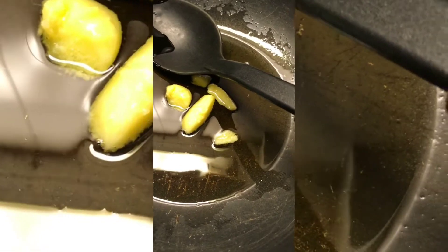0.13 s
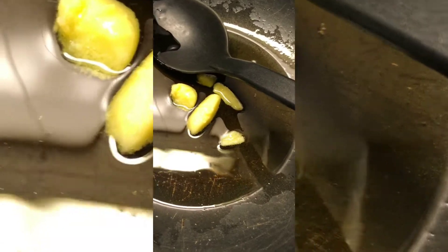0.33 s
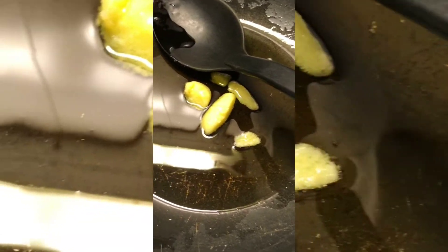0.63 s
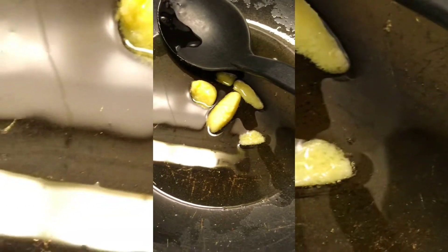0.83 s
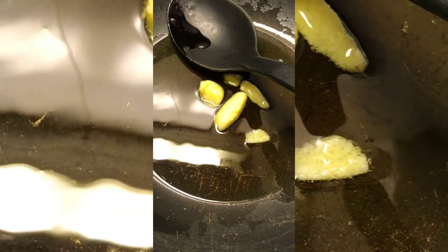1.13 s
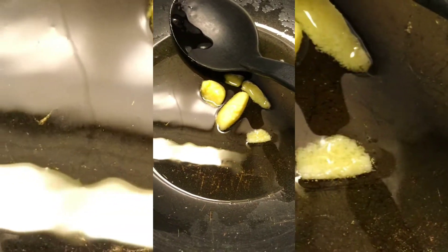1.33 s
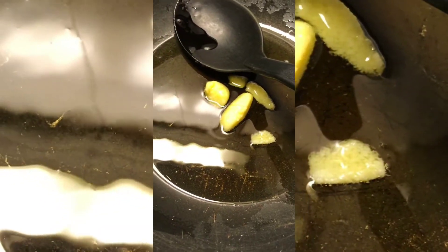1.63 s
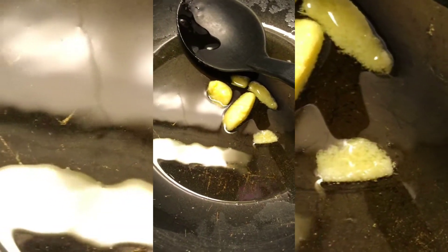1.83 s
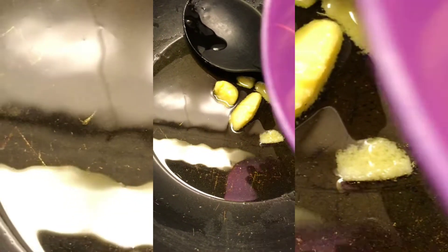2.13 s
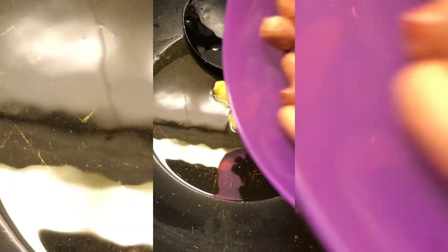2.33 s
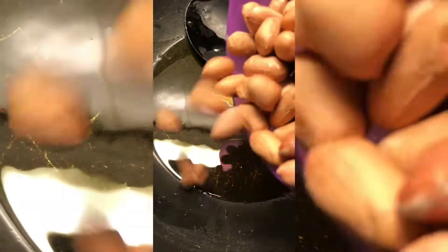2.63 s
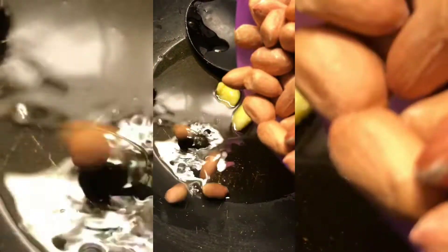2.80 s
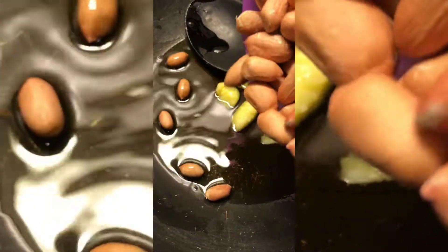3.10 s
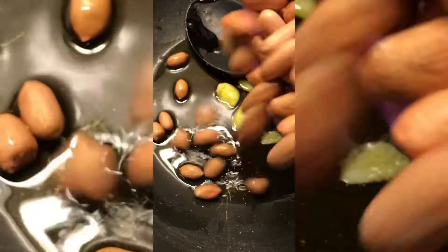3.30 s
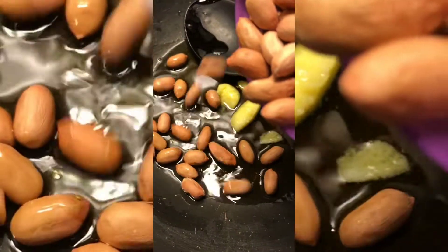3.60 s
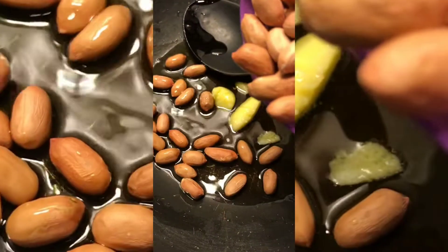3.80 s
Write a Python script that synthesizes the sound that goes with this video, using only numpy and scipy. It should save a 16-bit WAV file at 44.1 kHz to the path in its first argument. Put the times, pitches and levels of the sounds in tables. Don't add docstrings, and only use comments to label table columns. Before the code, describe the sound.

Raw peanuts knock in a plastic bowl, then drop in two clattering bursts into a buttered steel pan, close to the microphone, in a small kitchen with a steady low extractor fan hum.

```python
import sys
import numpy as np
from scipy import signal
from scipy.fft import rfft, irfft
from scipy.io import wavfile
from scipy.ndimage import uniform_filter1d

SR = 44100
rng = np.random.default_rng(int(sys.argv[2]) if len(sys.argv) > 2 else 0)


def gain_from_db(level_db):
    decades = np.asarray(level_db, float) / 20
    return 10 ** decades


def dump(signal):
    limited = np.clip(np.atleast_2d(signal).T, -1, 1)
    pcm = np.round(limited * 32767).astype(np.int16)
    wavfile.write(sys.argv[1], SR, pcm)


N = 174195

# freq_hz, density_db
AIR_COLOUR = [(25, -34), (55, -6.5), (200, -11), (470, -35), (1400, -31.5), (3500, -40), (8000, -53.5),
              (15800, -56.5)]
# time_s, level_db
AIR_SWELL = [(0, 3), (1, 3), (2.2, 1), (3.1, 4), (3.95, 1.5)]
# freq_hz, width_hz, level_db
DUCT_MODES = [(99.64, 15, -41), (131, 12, -46), (225.3, 73, -51), (325.5, 82, -47), (617.7, 67, -51.5),
              (924, 200, -52), (1220, 260, -59), (1668, 77, -66.5), (5200, 270, -92), (2160, 64, -74),
              (2460, 93, -69), (3316, 200, -72)]
AIR_DB, HUM_HZ, HUM_PEAK_DB = -44.5, 99.5, -37

# start_s, length_s, level_db
SCUFFS = [
    (.2325, .002, 0),
    (.239, .009, 0),
    (.250, .014, -13),
    (.266, .002, -4),
    (.296, .008, -7),
]
# freq_hz, density_db
SCUFF_COLOUR = [(1300, 7.5), (3800, 1.5), (4800, -1), (5600, 8.5), (6600, 2), (8500, 0), (12500, -1),
                (15800, -3)]
SCUFF_DB, SCUFF_GRIT_DB = -43, 1.5
SCUFF_TAIL_DB, SCUFF_TAIL_T60_S = -17.5, 0.37

# time_s, level_db
ROLL_LEVEL = [(2.28, -64), (2.33, -44), (2.6, -32.5), (2.68, -46), (2.72, -68), (2.88, -54), (2.99, -41.5),
              (3.04, -50), (3.19, -49.5), (3.22, -46.5), (3.4, -51), (3.53, -38), (3.7, -60), (3.8, -47.5),
              (3.86, -54)]
# freq_hz, density_db
ROLL_COLOUR = [(600, 3), (1000, 4.5), (2500, -10.5), (4500, -12.5), (7000, -20.5), (10000, -26),
               (15800, -23.5)]
ROLL_TICKS_PER_S, ROLL_GRAIN_DB, TICK_T60_S = 440, 3.8, 0.01
RUB_SHARE = 0.69

# start_s, end_s, level_db
SLIDES = [
    (2.31, 2.67, -65),
    (3.16, 3.315, -60),
    (3.33, 3.8, -65),
]
SLIDE_GRIT_DB = 5

# low_db, high_db, top_db
BOWL_KNOCKS = [(2.358, -24.5, -4, -30, -48.5), (2.368, -44, 11, -28, -42), (2.414, -41, -18, -21, 0.5),
               (2.434, -32, -7, -19, -26), (2.467, -25, 2, -19, -14), (2.488, -7, -6.5, 1, -15),
               (2.51, -19.5, -5, -1, -16), (2.545, -15, -28, 0, -19), (2.548, -15, 3, -1, -13),
               (2.557, -16, -7.5, -6, -11), (2.57, -28, -14, 2, -17), (2.578, -22.5, -2, 2, -26),
               (2.597, -12, -6.5, -4.5, -39), (2.602, -15, -12, -7, -27), (2.619, -15.5, -1, -4, -17),
               (2.641, -15, -9, -6, -16), (3.2358, -11.5, -4.5, -5.5, -20.5)]
# start_s, peak_db, low_db, high_db, top_db
FIRST_HANDFUL = [(2.709, -8, -11, 3, -11), (2.715, -23, -25, 10.5, 2.5), (2.743, -28, -1, -26, -11),
                 (2.759, 3, -13, -4.5, -13), (2.779, -20.5, 3, -22, -29), (2.816, -1, -15.5, -8.5, -22),
                 (2.826, -10.5, -37, 2, -26), (2.848, 6, -18, -7.5, -26), (2.865, -22, 2.5, 1, 0.5),
                 (2.882, -21.5, -2, 8, -2), (2.913, -13, -14, 1, -9.5), (2.929, -7.5, -10.5, -1, -39),
                 (2.964, -26, -0.5, -6, -2.5), (2.987, -15, -18, -5, -21)]
# start_s, peak_db, low_db, high_db, top_db
SECOND_HANDFUL = [(3.3235, -16, 3.5, -8, -24), (3.327, 3, -41, -9, -17.5), (3.332, 6, -14.5, -8, -49),
                  (3.368, 3, -18, -5.5, -18), (3.374, -2, -15, -0.5, -38), (3.386, -6.5, -13, -6, -27),
                  (3.3976, 4, -14, -10, -22.5), (3.432, -2, -12.5, -15, -20), (3.469, -15, -6, 1, -3),
                  (3.497, -7, -12, -6, -9), (3.5, 3, -9.5, -3.5, -26), (3.5095, 6.5, -15.5, -8, -21),
                  (3.524, -6, -40, -10.5, -49), (3.563, -11, -18, -20, -34), (3.577, -8, -18, -2, -12.5),
                  (3.589, -12, -32, -23, -32), (3.611, -9.5, -16.5, -1.5, -17),
                  (3.654, -10.5, -10, -4.5, -9), (3.682, -11.5, -9, -21, -39), (3.715, -7.5, -15, -17, -33),
                  (3.765, -5.5, -6, -9.5, -48), (3.776, -5.5, -12.5, -47, -51)]
# freq_hz, level_db, t60_s
BOWL_MODES = [(640, -5, .04), (940, 2, .07), (1010, -3, .08), (1200, -7, .05), (1650, -10, .015),
              (2300, 0, .03), (3600, -2, .02), (3950, -3, .018), (4600, -7, .015)]
# freq_hz, level_db, t60_s
EMPTY_PAN_MODES = [(1015, -1.5, 0.032), (1171, -0.5, 0.087), (1183, 1.5, 0.053), (1730, -9, 0.046),
                   (1770, 6, 0.083), (2090, -6, 0.012), (2560, -5.5, 0.055), (2750, -9, 0.029),
                   (3380, -2, 0.043), (3970, 2, 0.025), (4250, -1, 0.027), (5380, -10, 0.02)]
# freq_hz, level_db, t60_s
EMPTY_PAN_THUD = (632, -6, 0.11)
# freq_hz, level_db, t60_s
LOADED_PAN_MODES = [(1006, -1.5, 0.043), (1165, 0.5, 0.1), (1223, -3.5, 0.048), (1680, 1.5, 0.066),
                    (1774, 5, 0.081), (2210, -8, 0.025), (2555, -8, 0.069), (2900, -10, 0.025),
                    (3352, 1.5, 0.027), (3950, -0.5, 0.022), (4520, 5.5, 0.016), (5735, -1.5, 0.029)]
# low_hz, high_hz, level_db, crack_db (re modes), crack_t60_s
REGISTERS = [(582, 1660, 1, -7.5, 0.094), (1490, 3220, -2.5, 2.5, 0.063), (3358, 5770, 0.5, -3, 0.05),
             (6300, 8900, 1, 0, 0.048), (8770, 14300, -3.5, 0, 0.04)]
# start_s, peak_db, pitch_hz, t60_s
TAPS = [(2.3583, -8.5, 1430, 0.0046), (2.3688, -20, 1160, 0.0081), (2.434, -23.5, 1210, .01),
        (3.7654, -12.5, 4000, 0.019), (2.742, -22, 1770, 0.036), (2.4675, -19, 900, 0.01),
        (2.556, -16, 940, .045), (2.5655, -17, 2500, .006), (2.586, -16, 980, 0.023),
        (2.615, -30, 1300, .008), (2.6225, -20, 930, .035), (2.655, -20, 920, 0.014),
        (2.68, -27.5, 2500, 0.0099), (2.9755, -19, 4500, 0.0045), (2.709, -24.5, 628, 0.088),
        (2.76, -22, 621, 0.097), (2.817, -20.5, 620, 0.074), (2.914, -25, 636.4, 0.18),
        (2.965, -36, 626, 0.26), (3.2362, -25.5, 1200, 0.016), (3.2475, -15.5, 980, 0.01),
        (3.262, -35, 4060, .02), (3.3015, -32, 1500, .01), (3.336, -1, 1750, 0.017),
        (3.349, -14, 1750, 0.032), (3.381, -4.5, 1805, 0.03), (3.401, -5.5, 1768, .025),
        (3.435, 0, 1733, 0.018), (3.465, -23, 4070, 0.031), (3.482, -24, 3960, 0.033),
        (3.325, -13.5, 844, 0.031), (3.503, 0, 2660, 0.012), (3.5125, -9, 1720, .02),
        (3.522, -11, 2720, .012), (3.534, -17, 3030, .01), (3.537, -12.5, 1200, 0.022),
        (3.545, -20, 1300, 0.022), (3.5785, -19, 1770, 0.039), (3.59, -10, 1610, .012),
        (3.7153, -14.5, 1698, 0.038)]
MODE_SPREAD_DB, DETUNE_RATIO, DAMPING_SPREAD = 7.5, 0.0092, 0.76
CONTACT_S, RATTLE_DB, BOWL_CRACK_SHARE = 0.0003, 4.5, 0.65
SNAP_DB, SNAP_T60_S = 5.5, 0.0039

# start_s, peak_db
SPITS = [
    (2.7148, -14),
    (3.3973, -16),
    (3.468, -11.5),
]
SPIT_LOW_HZ, SPIT_T60_S = 11500, 0.012

ROOM_T60_S, ROOM_DB, WALL_CUT_HZ, ROOM_ONSET_S = 0.39, -17, 1760, 0.0097
DUCK_FROM_DB, DUCK_SHARE, RECOVER_DB_PER_S = -24.5, 0.17, 5
CUTOFF_HZ = 17050


def rms_one(x):
    return x / np.sqrt(np.mean(x ** 2) + 1e-20)


def in_time(rows):
    return np.interp(np.arange(N) / SR, *np.transpose(rows))


def coloured(x, spectrum):
    hz, db = np.transpose(spectrum)
    log_hz = np.log(np.maximum(np.arange(N // 2 + 1) * SR / N, 1))
    below = np.maximum(np.log(hz[0]) - log_hz, 0)
    above = np.maximum(log_hz - np.log(hz[-1]), 0)
    gain_db = np.interp(log_hz, np.log(hz), db) - 20 * below - 900 * above
    return rms_one(irfft(rfft(x) * gain_from_db(gain_db), N))


def fan():
    out = gain_from_db(AIR_DB + in_time(AIR_SWELL)) * coloured(rng.standard_normal(N), AIR_COLOUR)
    zeros = [1, 0, -1]
    for hz, width_hz, db in DUCT_MODES:
        radius = np.exp(-np.pi * width_hz / SR)
        poles = [1, -2 * radius * np.cos(2 * np.pi * hz / SR), radius ** 2]
        once = signal.lfilter(zeros, poles, rng.standard_normal(N + SR))
        twice = signal.lfilter(zeros, poles, once)
        out += gain_from_db(db) * rms_one(twice[SR:])
    return out + gain_from_db(HUM_PEAK_DB) * np.sin(2 * np.pi * HUM_HZ * np.arange(N) / SR)


def scuffs():
    t = np.arange(N) / SR
    shape = np.zeros(N)
    for start, length, db in SCUFFS:
        rub_db = db - 1300 * np.maximum(t - start - length, 0) - 150 * np.abs(t - start)
        tail_db = db + SCUFF_TAIL_DB - 60 * np.abs(t - start) / SCUFF_TAIL_T60_S
        shape += (gain_from_db(rub_db) + gain_from_db(tail_db)) * (t > start)
    noise = rng.standard_normal(N)
    grit = gain_from_db(SCUFF_GRIT_DB * np.repeat(noise[::40], repeats=40)[::-1][:N])
    return shape * coloured(noise * grit, SCUFF_COLOUR)


def rolling():
    sizes = gain_from_db(ROLL_GRAIN_DB * np.minimum(rng.exponential(1, N), 3))
    touches = sizes * (rng.random(N) < ROLL_TICKS_PER_S / SR)
    ticks = signal.lfilter([1], [1, -gain_from_db(-60 / TICK_T60_S / SR)], touches)
    grain = (rms_one(ticks) + RUB_SHARE) * rng.standard_normal(N)
    return gain_from_db(in_time(ROLL_LEVEL)) * coloured(grain, ROLL_COLOUR)


def slides():
    t = np.arange(N) / SR
    shape = np.zeros(N)
    for start, end, db in SLIDES:
        shape += gain_from_db(db) * np.clip(np.minimum(t - start, end - t) * 18, 0, 1)
    noise = rng.standard_normal(N)
    steps = np.repeat(noise[::300], repeats=300)[::-1][:N]
    grit = gain_from_db(SLIDE_GRIT_DB * uniform_filter1d(steps, size=200))
    return shape * grit * coloured(noise, [(6000, 0), (15800, 0.0097)])


def blows(table, modes, crack_share=1):
    out, t = np.zeros(N + SR), np.arange(9000) / SR
    hz, mode_db, t60 = np.transpose(modes)[:, :, None]
    touch = 1 - np.exp(-t / CONTACT_S)
    for s, db, low_db, high_db, top_db in table:
        strength, tuning, damping = rng.standard_normal((3, *hz.shape))
        rocking = np.repeat(rng.standard_normal((len(hz), 60)), 150, axis=1)
        rattle_db = RATTLE_DB * uniform_filter1d(rocking, size=150)
        start_db = mode_db + MODE_SPREAD_DB * np.clip(strength, -2, 0.5)
        decay_db = 60 * t / t60 * np.exp(DAMPING_SPREAD * np.abs(damping))
        swing = np.sin(2 * np.pi * hz * (1 + DETUNE_RATIO * tuning) * t) * np.sign(tuning)
        struck = swing * gain_from_db(start_db + rattle_db - decay_db)
        noise, start = rng.standard_normal(len(t)), int(s * SR)
        register_db = (low_db, 0, high_db, top_db, top_db)
        for (lo, hi, level_db, crack_db, crack_t60), rel_db in zip(REGISTERS, register_db):
            tone = struck[(hz[:, 0] >= lo) & (hz[:, 0] < hi)].sum(axis=0) * touch
            dying = gain_from_db(-60 * t / crack_t60 / crack_share)
            snap = gain_from_db(SNAP_DB - 60 * t / SNAP_T60_S)
            burst = noise * (dying + snap)
            burst[:2] += gain_from_db(SNAP_DB + 9.5) * np.array([1, -1])
            band = signal.butter(3, [lo, hi], "band", fs=SR, output="sos")
            crack = signal.sosfilt(band, burst)
            both = tone / (np.abs(tone).max() + 1e-9) + gain_from_db(crack_db) * crack / np.abs(crack).max()
            out[start:start + len(t)] += gain_from_db(db + rel_db + level_db) * both / np.abs(both).max()
    return out[:N]


def taps():
    t = np.arange(SR // 2) / SR
    touch = 1 - np.exp(-t / CONTACT_S)
    out = np.zeros(N + SR)
    for s, db, hz, t60 in TAPS:
        start = int(s * SR)
        out[start:start + len(t)] += gain_from_db(db - 60 * t / t60) * touch * np.sin(2 * np.pi * hz * t)
    return out[:N]


def spits():
    t = np.arange(N) / SR
    shape = sum(gain_from_db(db - 60 * np.abs(t - s) / SPIT_T60_S) * (t > s) for s, db in SPITS)
    bright = signal.butter(4, SPIT_LOW_HZ, "high", fs=SR, output="sos")
    return signal.sosfilt(bright, shape * rng.standard_normal(N))


def kitchen(x):
    t = np.arange(SR // 2) / SR
    low, high = rng.standard_normal((2, len(t)))
    dull = signal.butter(1, WALL_CUT_HZ, fs=SR)
    bass = signal.lfilter(*dull, low) * gain_from_db(-60 * t / ROOM_T60_S)
    treble = (high - signal.lfilter(*dull, high)) * gain_from_db(-120 * t / ROOM_T60_S)
    spectrum = rfft(bass + treble)
    power = np.abs(spectrum) ** 2
    flatten = np.sqrt(uniform_filter1d(power, size=500) / uniform_filter1d(power, size=30))
    tail = irfft(spectrum * flatten, len(t)) * np.clip(t / ROOM_ONSET_S, 0, 1)
    return signal.fftconvolve(x, tail / np.sqrt(np.sum(tail ** 2)))[:N]


def scene():
    bowl = blows(BOWL_KNOCKS, BOWL_MODES, BOWL_CRACK_SHARE)
    pan = blows(FIRST_HANDFUL, EMPTY_PAN_MODES + [EMPTY_PAN_THUD])
    pan += blows(SECOND_HANDFUL, LOADED_PAN_MODES)
    nuts = rolling() + slides() + bowl + taps() + pan + spits()
    mix = fan() + gain_from_db(SCUFF_DB) * scuffs() + nuts + gain_from_db(ROOM_DB) * kitchen(nuts)
    return mix[None]


def low_pass(x):
    return signal.sosfilt(signal.butter(12, 16980, fs=SR, output="sos"), x)


def record(dry):
    recovery_db = RECOVER_DB_PER_S * np.arange(N) / SR
    level_db = 10 * np.log10(uniform_filter1d(dry[0] ** 2, size=441) + 1e-12)
    over_db = np.maximum(level_db - DUCK_FROM_DB, 0)
    duck_db = np.maximum.accumulate(DUCK_SHARE * over_db + recovery_db) - recovery_db
    ducked = dry * gain_from_db(-uniform_filter1d(duck_db, size=441))
    rounded = np.tanh(ducked / 1.25) * 1.25
    top_cut = signal.cheby2(12, 60, CUTOFF_HZ, fs=SR, output="sos")
    mix = signal.sosfilt(top_cut, rounded)
    return low_pass(mix)


dry = scene()
out = record(dry)
dump(out)
```